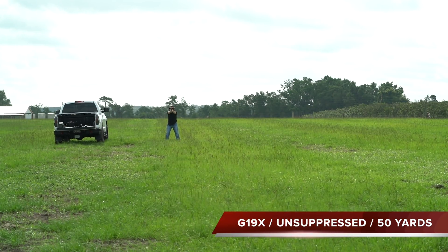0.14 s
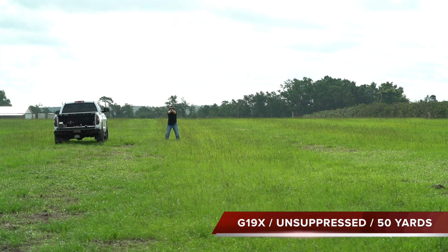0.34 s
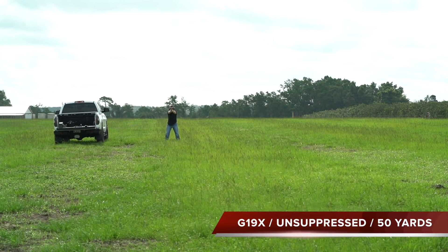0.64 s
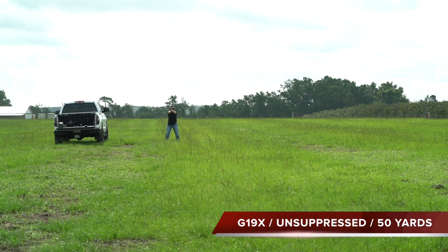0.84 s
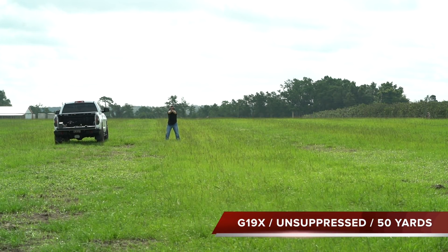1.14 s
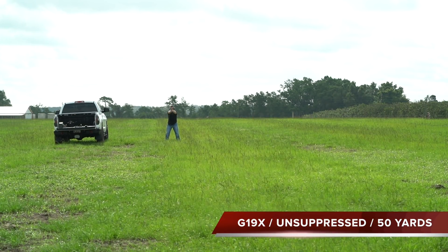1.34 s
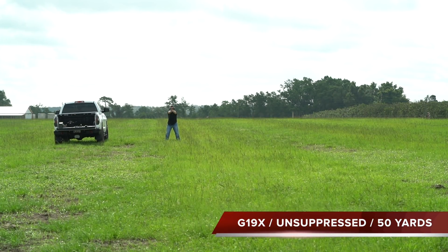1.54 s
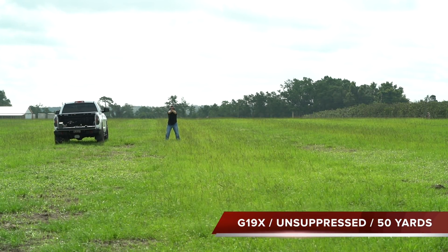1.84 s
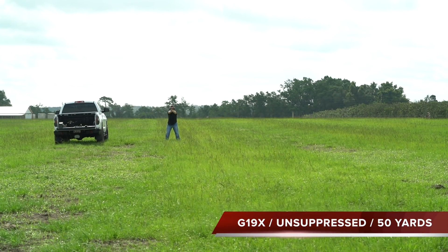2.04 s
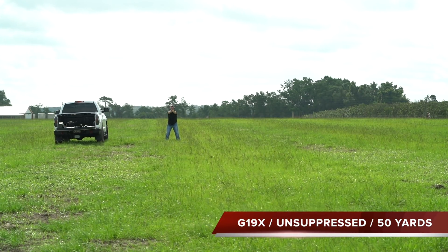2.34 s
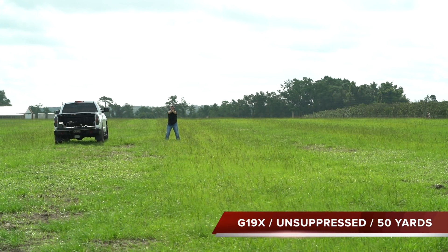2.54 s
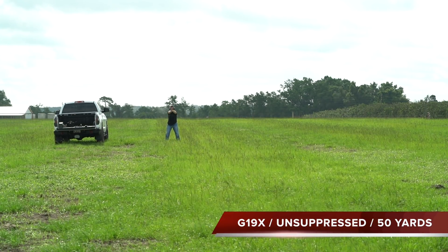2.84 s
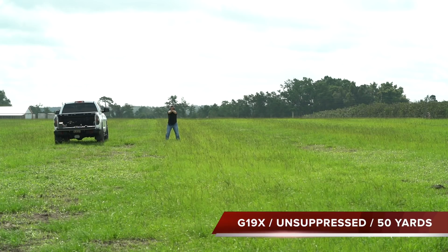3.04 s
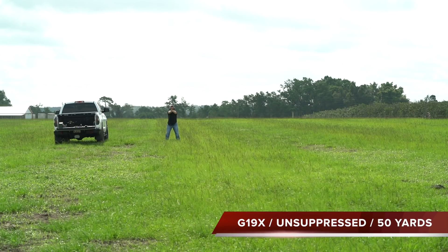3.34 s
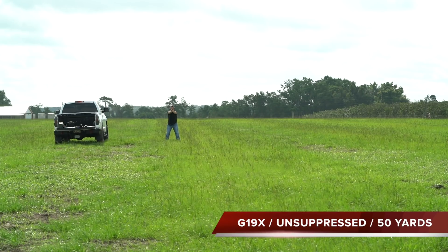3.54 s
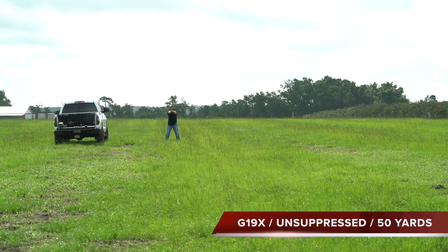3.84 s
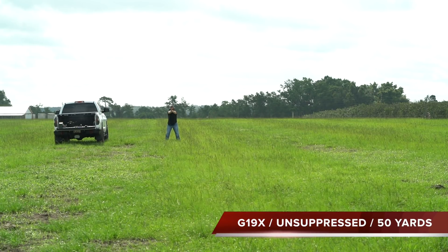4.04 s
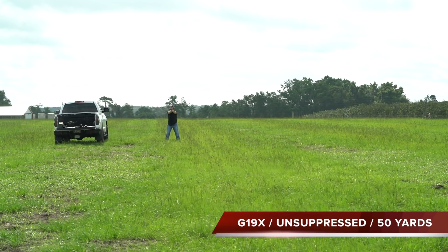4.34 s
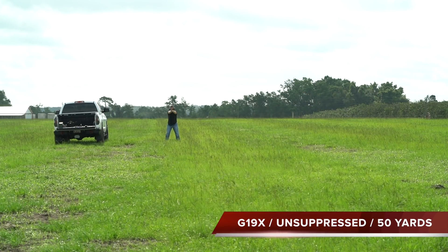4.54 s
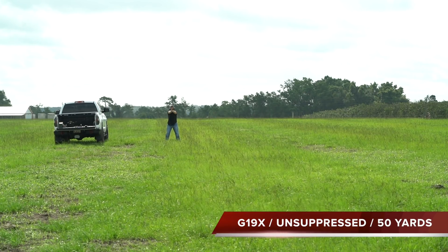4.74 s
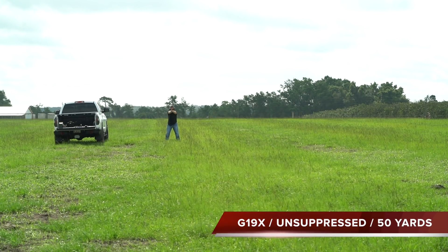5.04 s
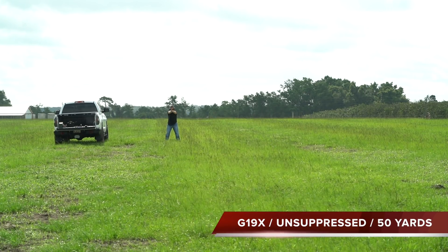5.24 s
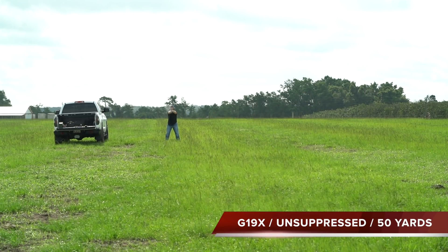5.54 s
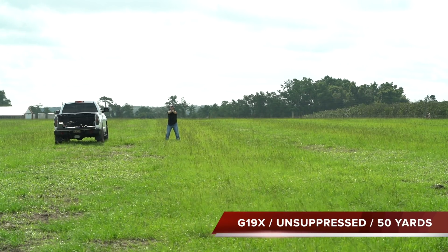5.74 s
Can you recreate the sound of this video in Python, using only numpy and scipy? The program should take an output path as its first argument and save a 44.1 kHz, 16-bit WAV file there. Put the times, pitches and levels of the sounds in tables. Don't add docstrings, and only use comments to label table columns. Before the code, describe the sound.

Four very loud, clipped pistol shots crack across an open grass field, each followed by a small ground strike and fading echoes over faint insects.

```python
import sys
import numpy as np
from scipy import signal
from scipy.io import wavfile

SR = 44100
rng = np.random.default_rng(int(sys.argv[2]) if len(sys.argv) > 2 else 0)


def amplitude_ratio(level_db):
    exponent = np.asarray(level_db, float) / 20
    return 10 ** exponent


def dump_mix(stems):
    frames = np.atleast_2d(stems).T
    limited = np.clip(frames, -1, 1)
    pcm = np.round(limited * 32767).astype(np.int16)
    wavfile.write(sys.argv[1], SR, pcm)


N = 260190

# start in seconds, shock level in dB, shock length in ms,
# blast level in dB, blast ring in Hz.
SHOTS = [
    (1.44266, 3.5, .266, 16.3, 942),
    (2.87634, 2.9, .262, 13.6, 778),
    (4.34589, 8, .23, 13.3, 890),
    (5.70037, 6.4, .221, 14.4, 944),
]


def rms_one(x):
    return x / np.sqrt(np.mean(x ** 2) + 1e-20)


def in_time(rows, outside=None):
    s, *columns = np.transpose(rows)
    t = np.arange(N) / SR
    return [np.interp(t, s, column, outside, outside) for column in columns]


def at_hz(points, hz):
    points = np.array(points)
    return np.interp(np.log(hz), np.log(points[:, 0]), points[:, 1])


def drift(rate):
    r = np.exp(-16 * np.pi * rate / SR)
    white = rng.standard_normal(N // 8 + 8002)
    slow = signal.lfilter([1], [1, -2 * r, r * r], white)[8000:]
    return np.interp(np.arange(N) / 8, np.arange(len(slow)), rms_one(slow))


def band(x, low_hz, high_hz):
    return signal.sosfilt(signal.butter(2, [low_hz, min(high_hz, 19000)], "band", fs=SR, output="sos"), x)


def panned(x, pan_db):
    return x * amplitude_ratio(np.array([[.5], [-.5]]) * pan_db)


def add(out, s, sound):
    i = int(round(s * SR))
    out[:, i:i + sound.shape[-1]] += sound[..., :max(N - i, 0)]


def bands(spectrum, shape, per_octave):
    edges = 22 * 2 ** np.arange(0, 9.65, 1 / per_octave)
    white = rng.standard_normal((2, 2) + shape)
    centres = np.sqrt(edges[1:] * edges[:-1])
    gains = amplitude_ratio(at_hz(spectrum, centres)) * (centres > spectrum[0][0])
    gains = gains / np.sqrt(np.sum(gains ** 2 * np.diff(edges)) * 2 / SR)
    for k in np.flatnonzero(gains):
        yield centres[k], gains[k] * band(white[k % 2], edges[k], edges[k + 1])


def stereo(pair, alike):
    alike = np.clip(alike, -1, 1)
    mid = np.sqrt((1 + alike) / 2) * pair[0]
    side = np.sqrt((1 - alike) / 2) * pair[1]
    return np.stack([mid + side, mid - side])


def n_wave(t, length, tail):
    return np.where((t >= 0) & (t < length), 1 - (1 + tail) * t / length, 0)


def ring(t, level_db, hz, t60):
    return amplitude_ratio(level_db - 60 * t / t60) * np.cos(2 * np.pi * hz * t) * (t > 0)


def shots():
    out = np.zeros((2, N))
    fine = np.arange(2000 * 4) / (4 * SR)
    bounce_after_cycles = .88
    for s, shock_db, shock_ms, blast_db, ring_hz in SHOTS:
        since = fine - (s * SR % 1) / SR
        late = np.maximum(since - shock_ms / 1000, 0)
        back = np.maximum(since - bounce_after_cycles / ring_hz, 0)
        shock = amplitude_ratio(shock_db) * n_wave(since, shock_ms / 1000, tail=.42)
        blast = ring(late, blast_db, ring_hz, t60=.00168)
        bounce = ring(back, -4.9, 470, t60=.005)
        push = -amplitude_ratio(-7.7 - 60 * late / .0166) * np.sin(2 * np.pi * 51 * late)
        wave = (shock + bounce + blast + push).reshape(-1, 4).mean(axis=1)
        wave = signal.lfilter(*signal.butter(2, 9500, fs=SR), wave)
        wave = np.clip(wave, -1.59, 1.59)
        wave = signal.lfilter(*signal.butter(3, 165, "high", fs=SR), wave)
        gas = band(rng.standard_normal((2, 2000)), 1500, 12000)
        gas = gas * amplitude_ratio(-26.5 - 60 * fine[::4] / 0.005)
        add(out, int(s * SR) / SR, panned(wave, 1.0) + gas)
    return out


def strikes():
    # start in seconds, crack level in dB, crack pitch in Hz, thud level in dB, thud pitch in Hz.
    hits = [
        (1.5619, -28, 4700, -23.5, 222),
        (3.002, -24, 4642, -22, 200),
        (4.4664, -21.5, 3463, -31.5, 161),
        (5.8193, -27.5, 4330, -32, 149),
    ]
    knock_hz, knock_db = 1017, -0.15
    out = np.zeros((2, N))
    t = np.arange(2500) / SR
    for s, crack_db, crack_hz, thud_db, thud_hz in hits:
        fade = amplitude_ratio(-60 * t / 0.0033) + amplitude_ratio(-17.5 - 60 * t / 0.097)
        grit = stereo(rng.standard_normal((2, len(t))), .7) * fade
        splinters = band(grit, crack_hz / 1.7, crack_hz * 1.1) + amplitude_ratio(-9) * band(grit, 1100, 9000)
        crack = amplitude_ratio(crack_db - 27) * rms_one(splinters)
        knock = -amplitude_ratio(crack_db + knock_db - 60 * t / 0.0056) * np.sin(2 * np.pi * knock_hz * t)
        thud = amplitude_ratio(thud_db - 60 * t / 0.03) * np.sin(2 * np.pi * thud_hz * t) * np.minimum(t / 0.0018, 1)
        clods = amplitude_ratio(thud_db - 5) * band(grit, 365, 1070)
        add(out, s, panned(crack + knock + thud + clods, -1.16))
    return out


def scatter(patches, tone, until, alike, pan_db, air_db, grain_db, grain_rate):
    start = patches[0][0]
    t = start + np.arange(int((until - start) * SR)) / SR
    power = 1e-20
    for delay, level_db, rise, t60 in patches:
        since = np.maximum(t - delay, 0)
        fade = amplitude_ratio(level_db - 60 * np.maximum(since - rise, 0) / t60)
        power = power + (fade * np.minimum(since / rise, 1)) ** 2
    clumps = drift(grain_rate)[:4 * len(t)].reshape(4, -1)
    echo = 0
    for k, (hz, pair) in enumerate(bands(tone, (4, len(t)), per_octave=3)):
        grain = .7 * clumps + 0.5 * np.roll(clumps, 900 * k + 900)
        air_loss_db = air_db * (t - start) * (hz / 10000) ** 1.15
        echo = echo + stereo(pair, alike) * amplitude_ratio(grain_db * grain - air_loss_db)
    echo = echo * np.sqrt(power) * np.clip((until - t) / .04, 0, 1)
    out = np.zeros((2, N))
    for k, shot in enumerate(SHOTS):
        add(out, shot[0] + start, panned(echo[:, k], pan_db))
    return out


def grass():
    # delay in seconds, level in dB, rise in seconds, 60 dB decay in seconds.
    patches = [
        (.002, -28, .001, .04),
        (.011, -32.5, .004, .15),
        (.03, -34.5, .01, .22),
        (.12, -49.5, 0.0037, 0.54),
    ]
    # frequency in Hz, level in dB per Hz.
    tone = [(47, -46), (80, -14.5), (422, -2), (657, -4), (1460, -4.5), (2270, -14.5), (3170, -11),
            (3790, -15.5), (13700, -24), (16000, -32)]
    return scatter(patches, tone, .36, alike=0.29, pan_db=0.56, air_db=42, grain_db=3.0, grain_rate=490)


def grass_hiss():
    # delay in seconds, level in dB, rise in seconds, 60 dB decay in seconds.
    patches = [
        (.004, -43.5, .003, .12),
        (.036, -39, .022, .06),
        (.05, -49, .01, .17),
    ]
    # frequency in Hz, level in dB per Hz.
    tone = [(1500, -22), (3000, -4), (4300, -3.5), (6000, -6), (9000, -5.5), (12500, -3.5), (15500, -1),
            (17000, -20)]
    return scatter(patches, tone, 0.31, alike=0.37, pan_db=-2.5, air_db=8, grain_db=1.94, grain_rate=300)


def slaps():
    delays = [.0121, .1548, .1701, .2, .2025, .7627]
    # peak level in dB, centre in Hz, pan in dB.
    faces = [
        (-29, 1600, .1),
        (-49, 2900, -3),
        (-49, 1500, -6),
        (-44, 2300, -9),
        (-45, 1300, -8),
        (-47, 920, 6.5),
    ]
    out = np.zeros((2, N))
    t = np.arange(1500) / SR
    for shot in SHOTS:
        for delay, (level_db, hz, pan_db) in zip(delays, faces):
            tone = np.cos(2 * np.pi * hz * t) * amplitude_ratio(-60 * t * hz / 10.0)
            edge = 0.63 * rng.standard_normal(len(t)) * (amplitude_ratio(-60 * t / .004) + amplitude_ratio(-12 - 60 * t / .03))
            copy = band(tone + edge, hz / 2.5, hz * 3.2)[None]
            level = amplitude_ratio(level_db + 1.5 * rng.standard_normal())
            add(out, shot[0] + delay, panned(level * copy, pan_db))
    return out


def tree_line():
    # delay in seconds, level in dB, rise in seconds, 60 dB decay in seconds.
    patches = [
        (.218, -43, 0.007, 0.07),
        (.222, -50.5, 0.0185, 0.75),
        (.252, -46.5, 0.01, 0.07),
        (.289, -47.5, 0.012, .11),
        (.335, -54, .03, .3),
        (.41, -59, .03, 1.0),
    ]
    # frequency in Hz, level in dB per Hz.
    tone = [(400, -46), (620, -12.5), (1000, 1.5), (1200, 1.5), (1900, -9), (2900, -6.5), (3800, -10),
            (5800, -12), (9400, -19.5), (15500, -28), (17000, -55)]
    return scatter(patches, tone, 0.96, alike=0.96, pan_db=-5, air_db=107, grain_db=1.8, grain_rate=90)


def hedge():
    # delay in seconds, level in dB, rise in seconds, 60 dB decay in seconds.
    patches = [
        (.24, -62, 0.054, .7),
    ]
    # frequency in Hz, level in dB per Hz.
    tone = [(1900, -33), (2500, -2), (3000, 0.5), (3500, -5), (4500, -25)]
    return scatter(patches, tone, 1.0, alike=.6, pan_db=-1.5, air_db=0, grain_db=2.5, grain_rate=18)


def far_woods():
    # delay in seconds, level in dB, rise in seconds, 60 dB decay in seconds.
    patches = [
        (.66, -68.5, 0.027, 0.4),
        (.75, -64.5, 0.014, 0.34),
        (.79, -67.5, 0.03, 0.75),
        (.86, -70.5, .03, 0.26),
        (.9, -72.5, 0.2, 3.1),
    ]
    # frequency in Hz, level in dB per Hz.
    tone = [(250, -25), (700, 1), (1500, -2.5), (3000, -5), (4600, -9), (5500, -19.5), (12000, -38.5)]
    return scatter(patches, tone, 1.8, alike=0.47, pan_db=9, air_db=32.5, grain_db=2.0, grain_rate=90)


def field():
    # frequency in Hz, level in dB per Hz.
    spectrum = [(12, -37), (20, -7.5), (79, -3), (248, -12.5), (301, -17), (357, -14.5), (485, -11),
                (540, -7.5), (1090, -16.5), (1910, -41.5), (3500, -46.5), (6500, -44.5), (11500, -46.5),
                (16000, -50.5)]
    # frequency in Hz, left-right likeness from 0 to 1.
    likeness = [(60, 0.43), (180, 0.62), (550, 0.92), (1650, 0.61), (4970, 0.97), (15000, 0.04)]
    # frequency in Hz, left minus right in dB.
    balance = [(60, 0.5), (150, -1.5), (380, -5.5), (950, -1), (2380, 3.5), (5980, 5), (15000, 1)]
    # time in seconds, level in dB about its mean.
    gusts = [(0, 4), (.7, 3), (1.2, -0.4), (2.1, -2), (2.75, -2), (2.95, 1), (3.2, -1.9), (3.5, 5),
             (3.8, -2.5), (4.15, -3.5), (4.45, 0.8), (4.75, -4), (5.3, -4), (5.9, 1.5)]
    # time in seconds, level in dB about its mean.
    traffic = [(0, 0), (.5, -0.2), (1.3, -1.2), (2.15, 1.5), (2.8, 0.24), (3.6, -1), (4.2, 0.6),
               (4.9, -0.84), (5.9, -0.4)]
    wind_db = in_time(gusts)[0]
    traffic_db = in_time(traffic)[0]
    out = 0
    for hz, pair in bands(spectrum, (N,), per_octave=2):
        windy = np.clip(np.log2(200 / hz), 0, 1)
        swell = (1 - windy) * traffic_db * (hz < 2000) + windy * wind_db
        swell = swell + (1.1 + 3.1 * windy) * drift(3.5)
        out = out + amplitude_ratio(swell) * panned(stereo(pair, at_hz(likeness, hz)), at_hz(balance, hz))
    return amplitude_ratio(-62.0) * out


def far_machine():
    # tone in Hz, level in dB.
    tones = [
        (140, -79.5),
        (260, -82.5),
        (520, -77),
        (585, -77),
    ]
    surge_s, surge_length_s, surge_db = 2.113, 0.239, 13
    surge = np.exp(-((np.arange(N) / SR - surge_s) / surge_length_s) ** 2)
    hum = 0
    for hz, level_db in tones:
        tone = rms_one(band(rng.standard_normal(N), hz - 9, hz + 9))
        hum = hum + amplitude_ratio(level_db + 0.83 * drift(6.6) + surge_db * surge * min(250 / hz, 1)) * tone
    return panned(hum, -4)


def trill(start, buzz_end, end, level_db):
    start_hz, end_hz, width_hz = 7000, 7414, 470
    tail_hz, tail_width_hz, tail_db = 7750, 180, level_db - 7
    return [(start, level_db - 6.5, start_hz, width_hz),
            (.3 * start + .7 * buzz_end, level_db, end_hz, width_hz),
            (buzz_end, level_db, end_hz, width_hz),
            (buzz_end + .008, tail_db, tail_hz, tail_width_hz),
            (end, tail_db - 3, tail_hz, tail_width_hz)]


def buzzing_insect():
    # start in seconds, end of buzz in seconds, end of thin tail in seconds, level in dB.
    calls = [
        (-.05, .436, .52, -84),
        (1.6, 1.8, 2.11, -88),
        (2.95, 3.2, 3.44, -87.5),
        (4.45, 4.86, 4.92, -84.5),
    ]
    t = np.arange(N) / SR
    pulses = (.5 + .5 * np.sin(2 * np.pi * 98 * t)) ** 0.5
    level, hz, width_hz = np.zeros((3, N))
    for call in calls:
        track = trill(*call)
        level += amplitude_ratio(in_time(track, outside=-200)[0])
        _, call_hz, call_width_hz = in_time(track, outside=0)
        hz += call_hz
        width_hz += call_width_hz
    beats = np.cumsum(2 * width_hz + 1) / SR
    waver = [np.interp(beats, np.arange(3000), draw) for draw in rng.standard_normal((2, 3000))]
    phase = 2 * np.pi * np.cumsum(hz) / SR
    buzz = rms_one(pulses * (waver[0] * np.sin(phase) + waver[1] * np.cos(phase)))
    return panned(level * buzz, 1.0)


def insect_choruses():
    # low edge in Hz, high edge in Hz, level in dB, pan in dB.
    choruses = [
        (3930, 5250, -87, 6),
        (7630, 10300, -91, 2),
    ]
    out = 0
    for low_hz, high_hz, level_db, pan_db in choruses:
        noise = stereo(rng.standard_normal((2, N)), 0.18)
        noise = band(band(noise, low_hz, high_hz), low_hz, high_hz)
        shimmer = amplitude_ratio(level_db + 1.2 * drift(3.8) + 0.97 * drift(40))
        out = out + shimmer * panned(rms_one(noise), pan_db)
    return out


def scene():
    echoes = grass() + grass_hiss() + slaps() + tree_line() + hedge() + far_woods()
    background = field() + far_machine() + buzzing_insect() + insect_choruses()
    return shots() + strikes() + echoes + background


def low_pass(x):
    return signal.sosfilt(signal.butter(12, 16000, fs=SR, output="sos"), x)


def record(dry):
    flat_topped = np.clip(dry, -1, 1)
    return low_pass(flat_topped)


dry = scene()
out = record(dry)
dump_mix(out)
```